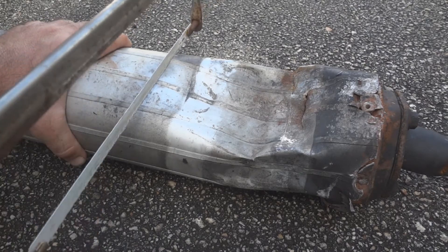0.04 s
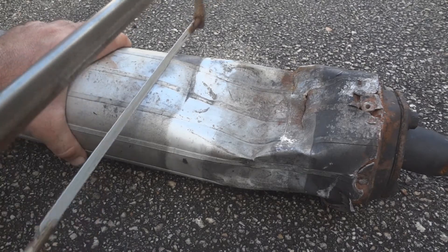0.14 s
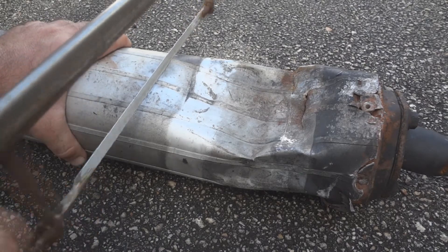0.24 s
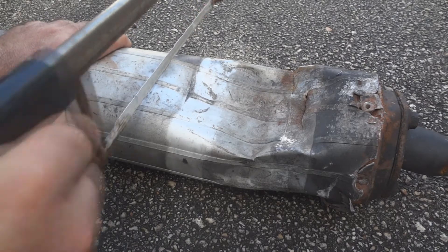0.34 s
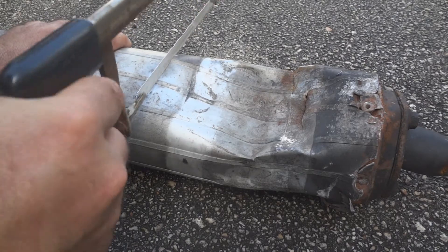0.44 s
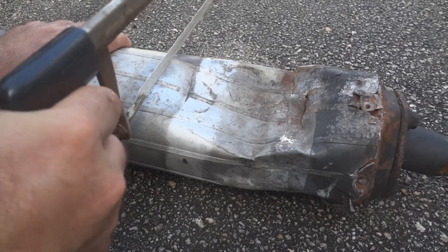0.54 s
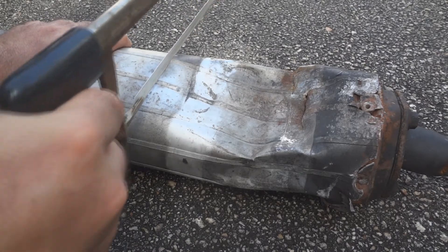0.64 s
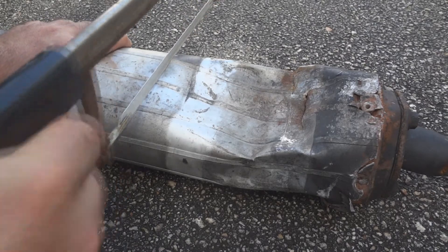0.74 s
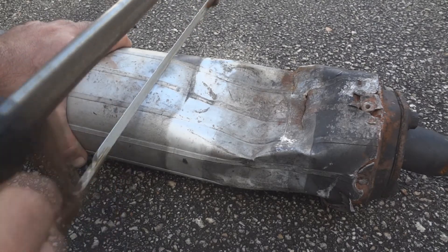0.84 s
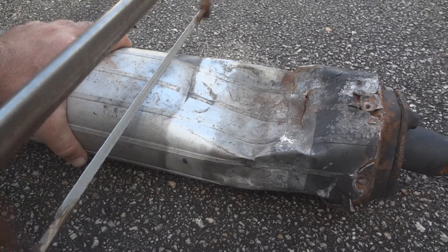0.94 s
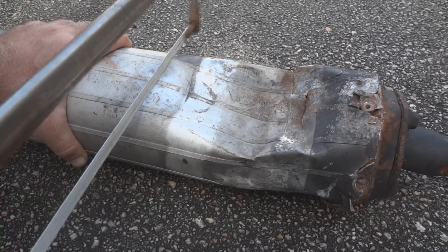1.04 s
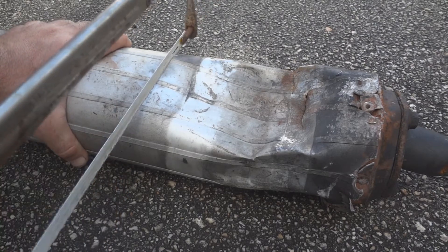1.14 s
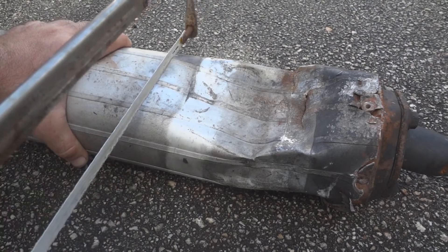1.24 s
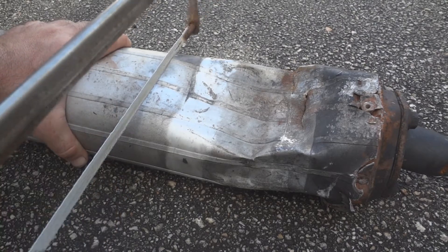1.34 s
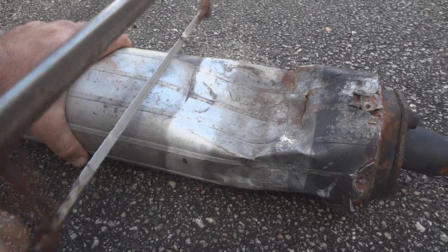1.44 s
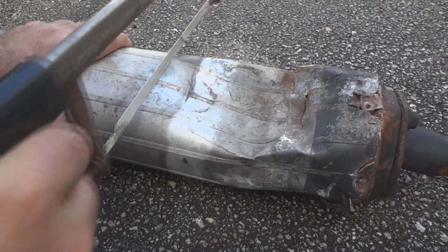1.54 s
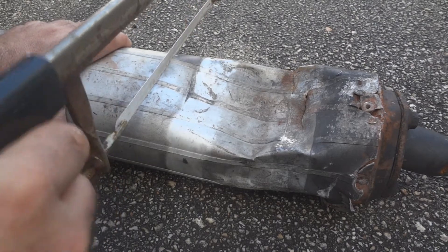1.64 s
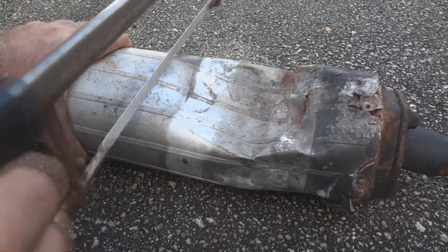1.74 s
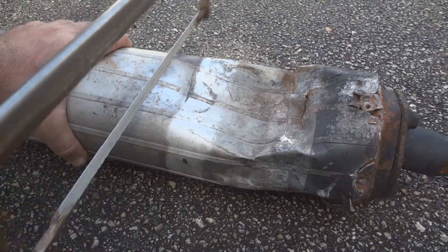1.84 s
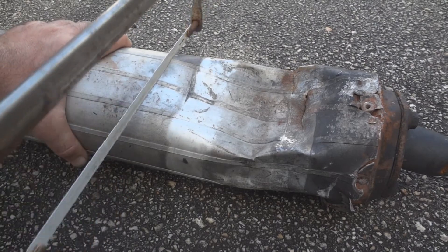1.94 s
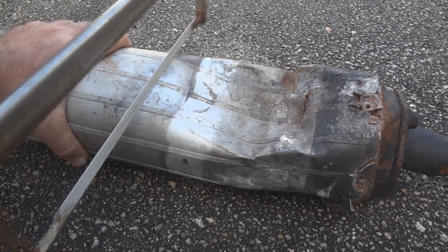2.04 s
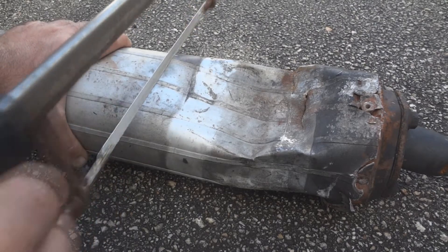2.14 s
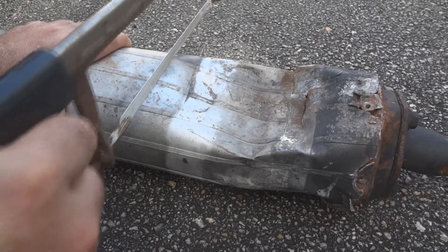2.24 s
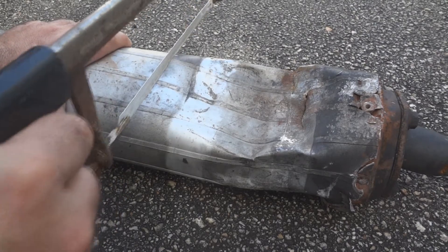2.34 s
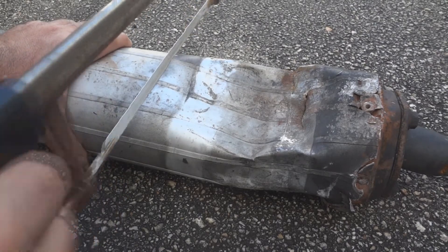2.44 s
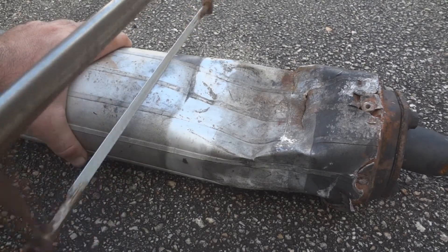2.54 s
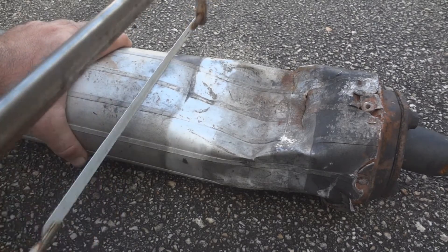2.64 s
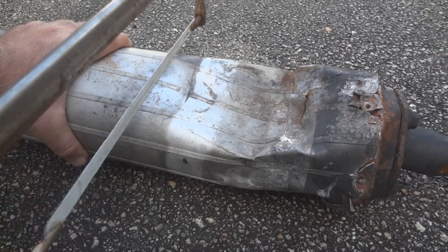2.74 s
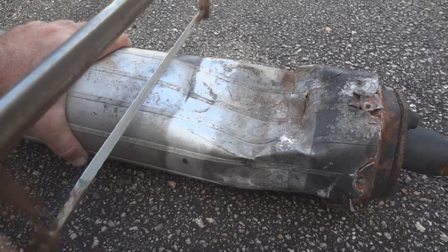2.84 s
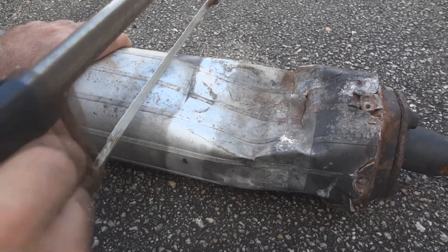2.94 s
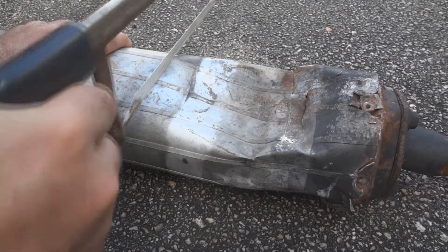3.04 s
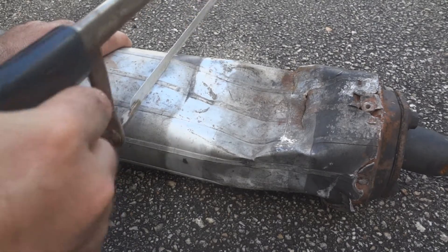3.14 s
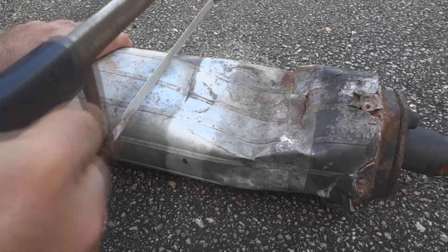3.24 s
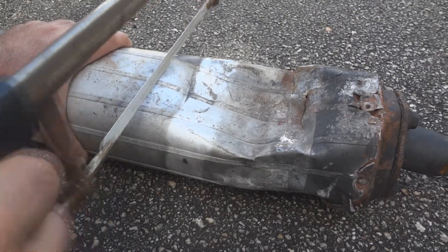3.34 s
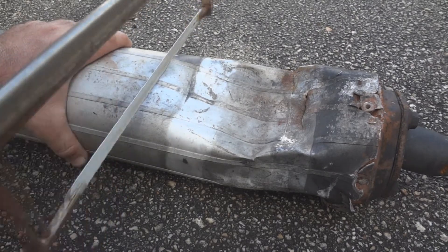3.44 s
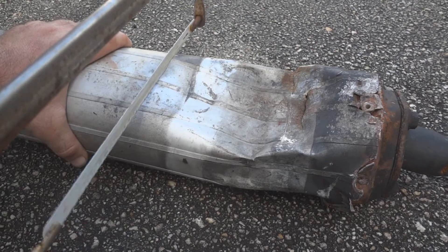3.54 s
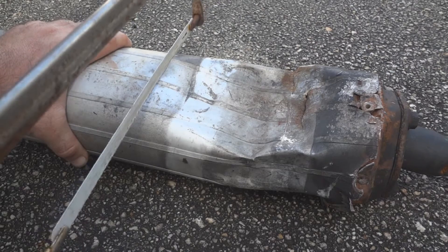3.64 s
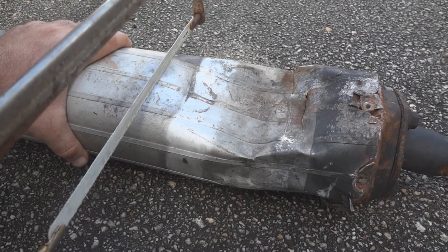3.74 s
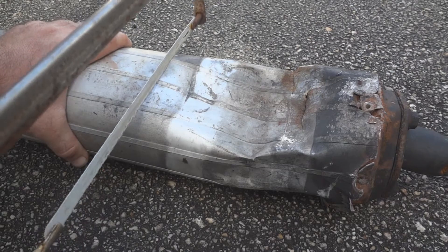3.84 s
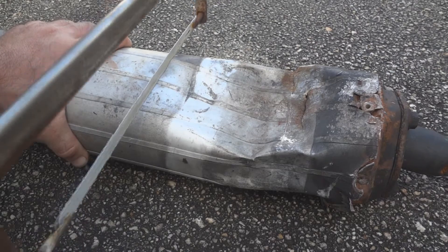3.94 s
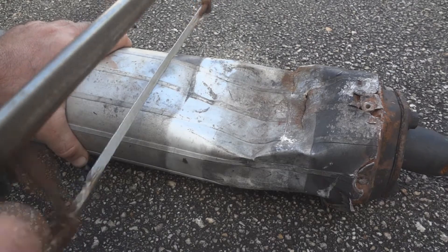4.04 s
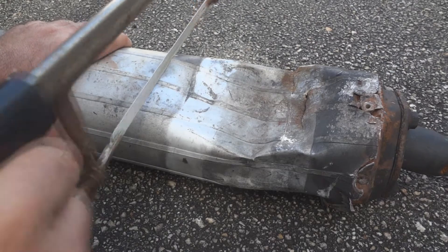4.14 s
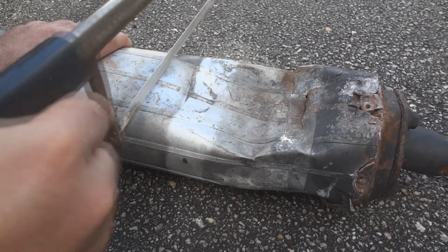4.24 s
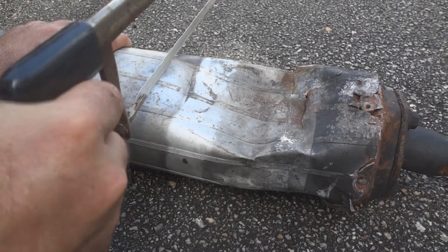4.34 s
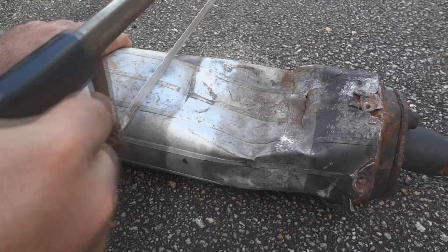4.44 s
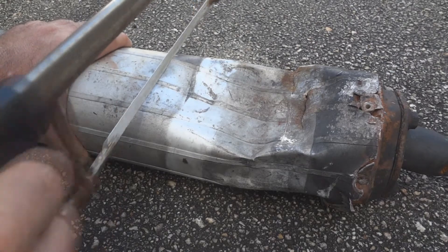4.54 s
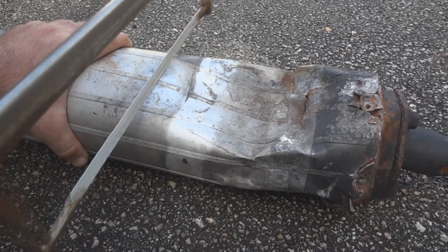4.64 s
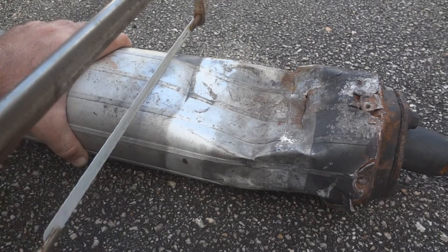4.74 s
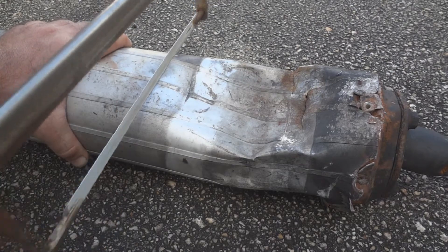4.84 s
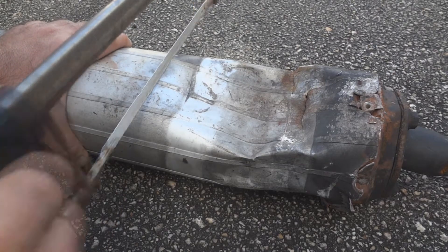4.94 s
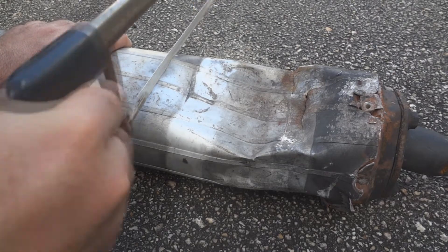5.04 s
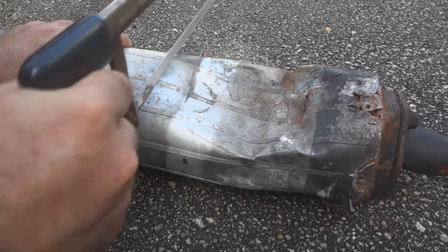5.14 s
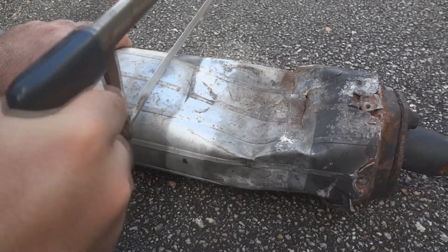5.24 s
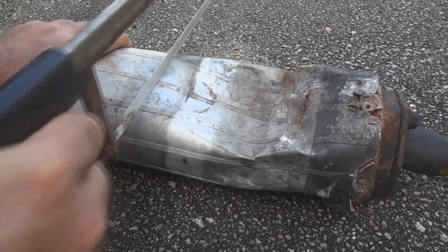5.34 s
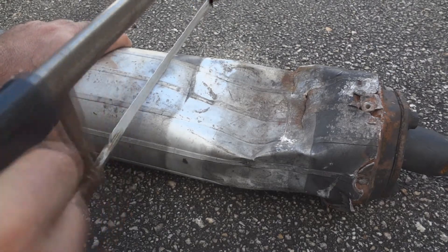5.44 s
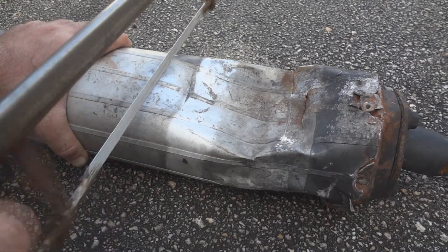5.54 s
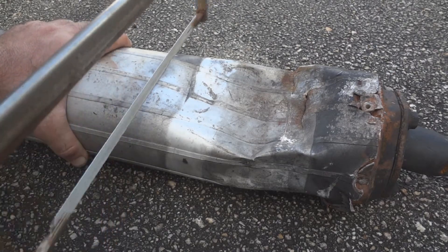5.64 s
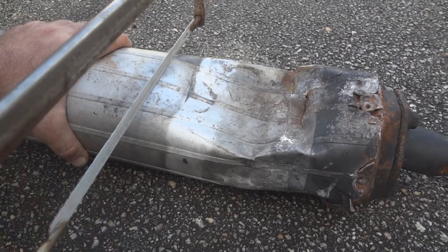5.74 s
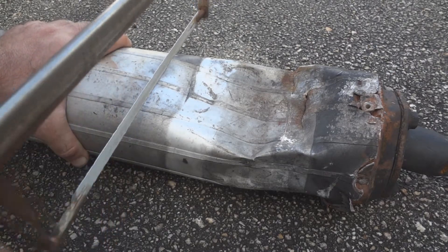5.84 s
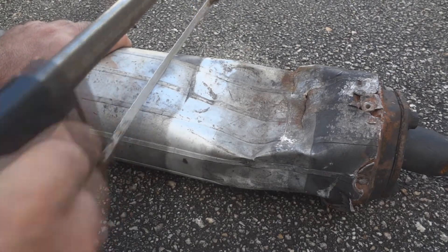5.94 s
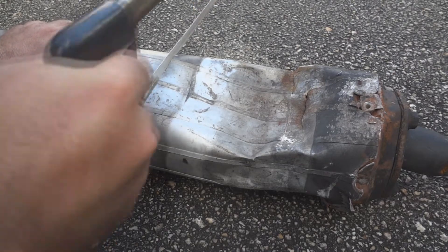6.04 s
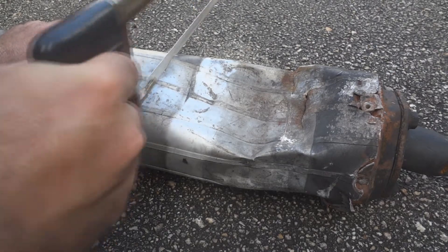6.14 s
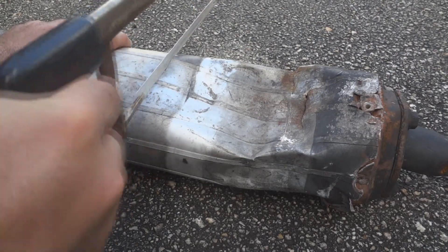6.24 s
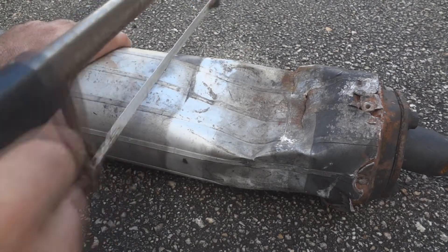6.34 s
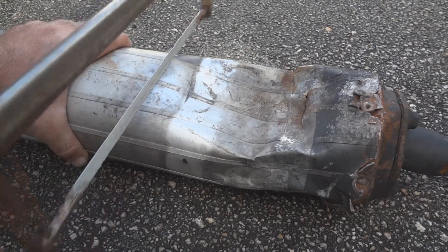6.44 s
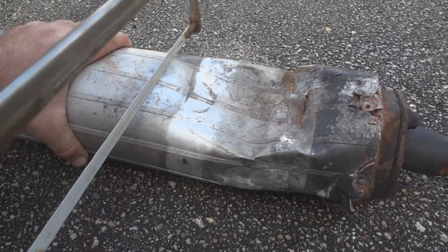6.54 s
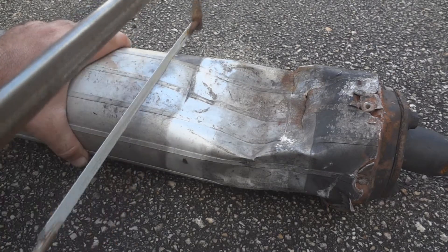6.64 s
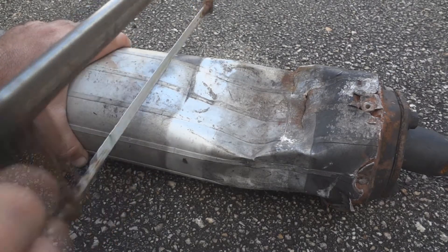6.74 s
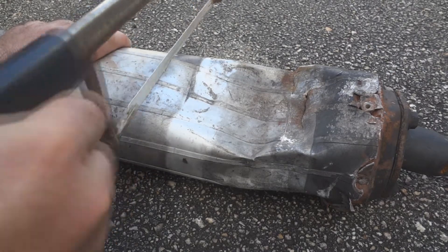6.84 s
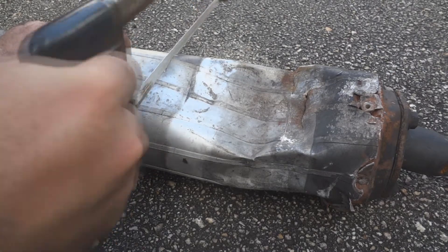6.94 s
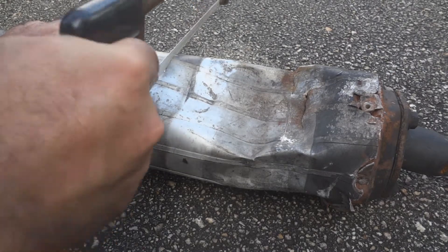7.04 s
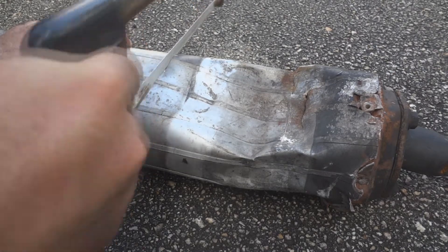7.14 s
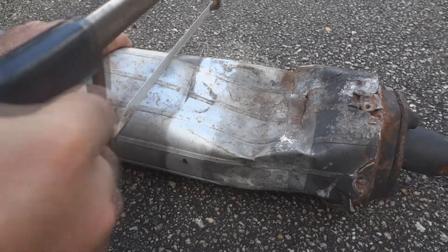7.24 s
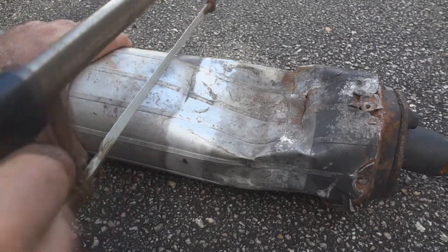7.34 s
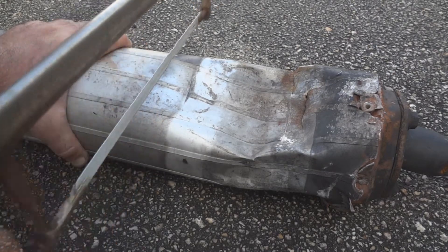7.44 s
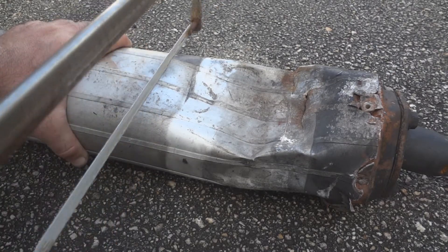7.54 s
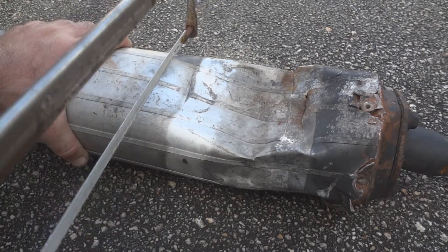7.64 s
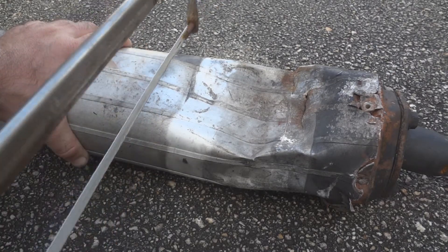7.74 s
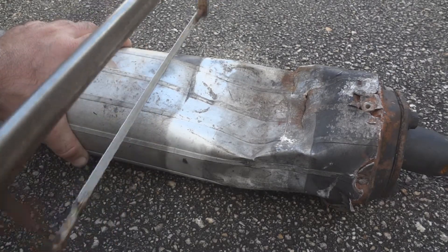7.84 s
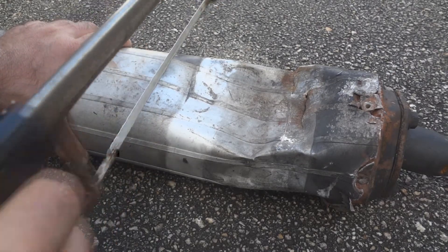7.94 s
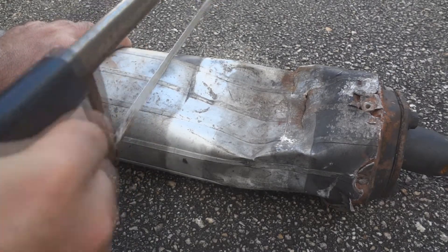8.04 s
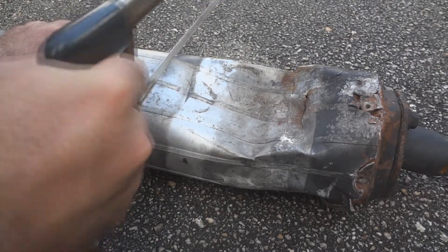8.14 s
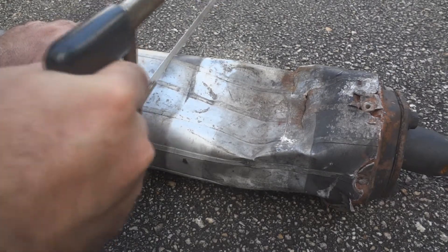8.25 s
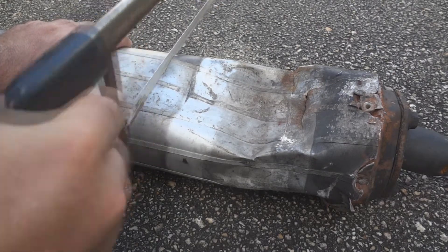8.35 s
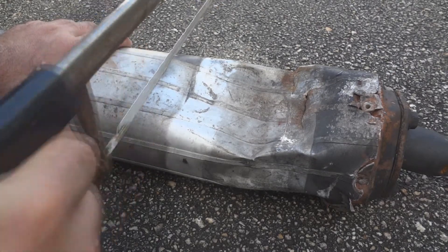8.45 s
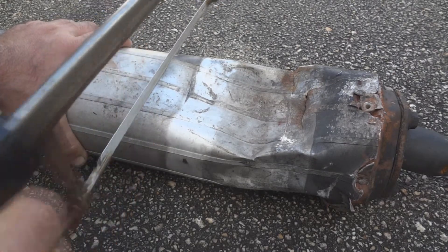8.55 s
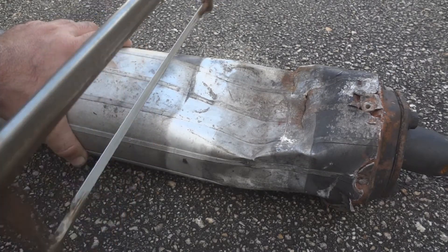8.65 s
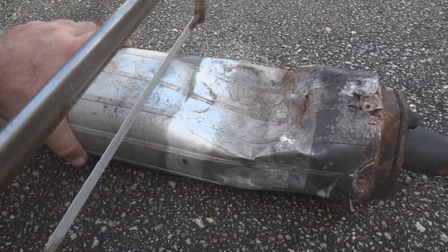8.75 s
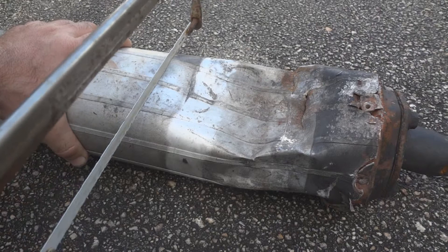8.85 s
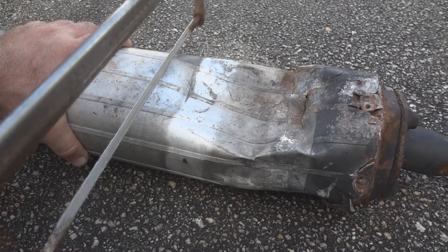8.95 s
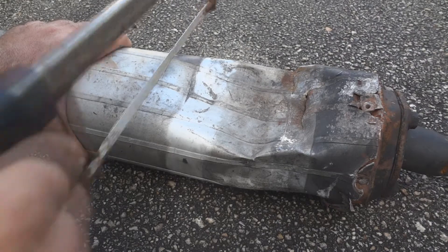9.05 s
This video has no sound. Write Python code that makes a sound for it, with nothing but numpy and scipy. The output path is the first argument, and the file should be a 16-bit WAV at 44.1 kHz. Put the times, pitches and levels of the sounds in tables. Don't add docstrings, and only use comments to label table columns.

```python
import sys
import numpy as np
from scipy import signal
from scipy.fft import rfft, irfft, next_fast_len
from scipy.io import wavfile
from scipy.ndimage import map_coordinates

SR = 44100
rng = np.random.default_rng(int(sys.argv[2]) if len(sys.argv) > 2 else 0)


def pcm_store(signal):
    levels = np.round(np.clip(np.atleast_2d(signal), -1, 1) * 32767)
    wavfile.write(sys.argv[1], SR, levels.astype(np.int16).T)


def decibels_to_gain(level_db):
    exponent = np.asarray(level_db, float) / 20
    return 10 ** exponent


N = 400428

# [t/s, level/dB]
BACKGROUND_LEVEL = [(0, -39), (1, -39), (1.7, -43), (3, -41.5), (4.6, -39), (5.1, -43.5), (5.6, -41.5),
                    (6, -44.5), (6.3, -34.5), (7.4, -37.5), (8.1, -40.5), (8.6, -38.5), (9.08, -38)]
# [f/Hz, density/dB]
FAR_SPECTRUM = [(12, -71), (20, -16.5), (123, -12), (277, -18.5), (377, -21.5), (422, -18), (472, -21),
                (1060, -22), (16000, -76)]
# [t/s, depth/dB]
DUCKS = [(.06, 8), (1.14, 19), (2.03, 10), (3.6, 15), (4.77, 19), (6.63, 22), (7.68, 16)]
# [start t/s, length/s, rasp level at start/dB, at end/dB, top tooth rate f/Hz]
PULLS = [(-.3, .4, -26, -31, 1402), (.86, .32, -30, -24, 1520), (1.82, 0.21, -33, -21.5, 1402),
         (2.51, .25, -34.5, -31, 1500), (3.32, 0.32, -32, -24, 1566), (4.52, 0.31, -28.5, -25.5, 1520),
         (5.38, 0.411, -41, -25, 1500), (6.28, 0.37, -36.5, -19.5, 1500), (7.215, 0.5, -29.5, -24, 1199),
         (8.43, 0.48, -35.5, -28, 1500)]
PUSHES = [(.275, 0.23, -25, -25.5, 1449), (1.46, 0.18, -25.5, -25, 1500), (2.12, .21, -25.5, -30, 1500),
          (2.95, 0.21, -23.5, -25, 1348), (4.08, 0.34, -29.5, -24, 1290), (4.96, 0.22, -24, -27.5, 1293),
          (5.93, 0.2103, -27, -24, 1300), (6.77, 0.32, -27.5, -28, 1441), (7.88, 0.35, -30, -22.5, 1300),
          (9.04, 0.24, -29.5, 2, 1432)]
PULL_SPEED = [(-.15, 1), (.35, 0.68), (.7, 1.0), (1.1, .74)]
PUSH_SPEED = [(-.15, 0.6), (.35, 0.99), (.7, .84), (1.1, .62)]
# [t/s, level/dB, half width/s]
JOLTS = [(.01, 2, .03), (1.0, -3, 0.075), (2.75, 3, .02), (3.335, 9.5, 0.031), (3.46, -6.5, 0.024),
         (5.158, 4.5, 0.017), (5.5, -4.5, 0.026), (6.03, 2.5, 0.041), (6.4, 5, 0.024), (6.78, 3, .02),
         (6.98, -4.5, 0.054), (7.216, 4.5, .02), (7.386, -0.5, 0.085), (7.483, -5.5, 0.066),
         (8.125, -13, 0.047), (8.204, 0, 0.022), (8.461, 12, 0.021), (8.56, 1.5, 0.022),
         (1.364, -12, .03), (2.42, -13, 0.012), (2.495, 2, 0.033), (0.787, 5, 0.043), (1.46, -3, 0.029),
         (4.89, 4.5, 0.019), (8.9, 4, 0.016), (7.86, 1.5, 0.042), (3.3, -20, 0.016), (4.465, -18, 0.037),
         (7.16, -13, 0.041), (8.28, 1, 0.012), (6.73, 5.5, 0.023), (8.15, 9, 0.022)]
# [t/s, f/Hz, level over tooth tone/dB, half width/s, glide: 1 rising, -1 falling]
SQUEAKS = [(.43, 1182, 9.5, .04, -0.97), (.89, 1162, 9.3, .06, 1), (1.64, 1211, 10.8, 0.032, -1.08),
           (1.87, 1098, 11, 0.031, 0.99), (2.26, 1233, 19, .03, -1.1), (2.497, 1124, 23.3, 0.03986, 1),
           (3.04, 1195, 12, .06, -1.014), (3.14, 1002, 8.3, 0.027, -1.05), (3.49, 1242, 7, 0.033, 0.78),
           (4.24, 1189, 10, 0.048, 1), (4.62, 1197, 10, 0.028, 1), (5.0, 1055, 10.1, 0.049, 1),
           (5.55, 1150, 26.7, .035, 1), (6.11, 980, 9.7, .025, -0.88), (6.155, 790, 17, .025, -1.2),
           (6.385, 1069, 20, .035, 0.94), (7.27, 902, 7.1, 0.043, 0.98), (8.18, 1013, 9, 0.039, -0.93),
           (8.585, 1120, 20, .04, 0.74)]
# [f/Hz, width/Hz, level/dB]
SHELL_LOW = [(743, 135, -2), (1000, 122, -2), (1138, 190, -2), (1290, 208, -1), (1520, 177, 2),
             (1880, 670, -10)]
# [f/Hz, width/Hz, level/dB]
SHELL_SKIN = [(2150, 140, -2.5), (2372, 120, -5), (2704, 276, -10.5), (3076, 126, -8.5), (3400, 278, -5.5),
              (3814, 202, -5.5), (4075, 330, -13), (4940, 530, -13.5), (5250, 280, -10.5), (5960, 340, -14)]
# [f/Hz, density/dB]
BLADE_HISS = [(5000, -31), (6500, 5.5), (8000, -4), (10000, -4.5), (11800, -10.5), (13000, -6),
              (14500, -7.5), (15700, -2.5)]
# [f/Hz, width/Hz, level/dB]
BLADE_RINGS = [
    [(6570, 230, 0)],
    [(7755, 150, 0), (9850, 90, -12)],
    [(8630, 68, -1.5), (11230, 45, -8)],
]
# [level cut at the far end/dB, level cut by the handle/dB]
BLADE_ENDS = [(-12.5, -8), (-11.5, -12.5), (-31, -11), (-24.5, -9)]
# [t/s, level of lower, middle, upper ring/dB]
TENSION = [(0, 4, 2, .1), (1.2, 3, -12.5, -16), (2.1, -11, -7, 0), (2.5, 0, -7, -6), (3.3, -13, 7, 3),
           (4.5, 1, -1, -3), (5.5, -8.5, 8, 2.5), (6.3, 8, 11, 2.5), (6.9, 4, 8, 9.5), (7.3, 8.5, 10.5, 2),
           (7.6, 4.5, 13, 13), (8.0, -11, -4, -3), (8.4, 8, 8.5, 0.5), (9.08, -13, -11, -6)]
# [f/Hz, width/Hz, level/dB]
FRAME = [(2172, 8.1, -1.2), (2740, 6.5, -1.5), (3450, 14, -11)]
# [lock t/s, fundamental level/dB, low, middle, high overtones level/dB]
CHATTER = [(-.02, -22, -28.5, -25.5, -34.5), (1.06, -25, -28.5, -31, -33.5), (1.955, -24.5, -36, -36, -33),
           (2.72, -24, -28.5, -23, -35), (3.53, -23, -27, -28.5, -44), (4.69, -23, -26, -28.5, -35.5),
           (5.74, -22, -31, -22.5, -35), (6.59, -24.5, -35, -53, -34), (7.57, -22, -26.5, -37.5, -30.5),
           (8.84, -21, -28.5, -24, -31)]
# [multiple of the fundamental, level/dB]
OVERTONES = [
    [(2, -0.5), (3, -1)],
    [(4, 1), (5, -3)],
    [(6, -0.5), (7, 3.5), (8, -6), (9, -21), (10, -14), (12, -17)],
]
# [t/s, peak level/dB]
KNOCKS = [(0.69, -76), (1.181, -10.5), (1.237, -10.5), (1.701, -3), (2.324, -4.5), (2.347, -3.5),
          (2.442, -43), (3.155, -14), (3.255, -21.5), (3.318, -26), (3.817, -21.5), (4.112, -16),
          (5.129, -19), (5.374, -22), (6.193, -9), (6.234, -28), (6.92, -2.5), (6.945, -8), (6.974, -4.5),
          (6.997, -10), (7.21, -16), (8.023, -8.5), (8.047, -6), (8.066, -4.5), (8.085, -2.5), (8.105, -3),
          (8.138, -9), (8.304, -1.5)]
# [f/Hz, level/dB, t60/s]
KNOCK_MODES = [(494, -5, 0.044), (663, -19, 0.18), (781, -7.5, 0.092), (980, 5, 0.023), (1122, -2, 0.044),
               (1300, -16, .05), (1520, -15.5, 0.078)]
# [t/s, peak level/dB, f/Hz, t60/s]
THUMP = [
    (4.112, -10, 227, 0.084),
]
# [f/Hz, side over mid level/dB]
SIDE_SPECTRUM = [(60, -58), (150, -20), (380, -5), (950, -13.5), (2380, -9.5), (5980, -13), (15000, -14)]

SWELL_S, LINGER_S = 0.13, 0.018


def unit(x):
    return x / np.sqrt(np.mean(x ** 2) + 1e-20)


def along(points, hz):
    f, v = np.transpose(points)
    return np.interp(np.log(hz + 1), np.log(f + 1), v)


def curves(rows):
    s, *cols = np.transpose(rows)
    return [np.interp(np.arange(N) / SR, s, c) for c in cols]


def wobble(rate):
    knots = rng.standard_normal(int(N * rate / SR) + 4)
    return map_coordinates(knots, [np.arange(N) * rate / SR])


def filtered(x, response):
    m = next_fast_len(len(x) + SR // 4)
    return irfft(rfft(x, m) * response(np.fft.rfftfreq(m, 1 / SR)), m)[:len(x)]


def modes(table):
    def response(f):
        return sum((-1) ** k * decibels_to_gain(db) * 1j * f * w / (c * c - f * f + 1j * f * w)
                   for k, (c, w, db) in enumerate(table))
    return response


def above(hz):
    return lambda f: (1j * f / hz) ** 2 / (1 + 1.4j * f / hz - (f / hz) ** 2)


def background():
    air_db, = curves(BACKGROUND_LEVEL)
    t = np.arange(N) / SR
    for s, depth_db in DUCKS:
        fall, recovery = ((s - t) / 0.055) ** 2, (t - s) / 0.11
        air_db = air_db - depth_db * np.exp(-np.where(t < s, fall, recovery))
    rush = filtered(rng.standard_normal(N), lambda f: decibels_to_gain(along(FAR_SPECTRUM, f)))
    hum_hz = 119.5 * (1 + 0.0099 * wobble(8))
    hum = np.sin(2 * np.pi * np.cumsum(hum_hz) / SR) * decibels_to_gain(-7.5 + 2.5 * wobble(10))
    wind = filtered(rng.standard_normal(N), lambda f: (f / 55) ** 2 / (1 + (f / 75) ** 5))
    gusts = unit(wind) * decibels_to_gain(-8 + 3.5 * wobble(9.3))
    return decibels_to_gain(air_db) * (decibels_to_gain(-4.0) * unit(rush) + hum + gusts)


def strokes():
    t = np.arange(0, N / SR + .01, .002)
    arch_db, fall = 2, 540
    creep_db, creep_fall = -24, 96
    power, rate, place = np.zeros(len(t)), [], []
    for rows, speed, rise, first in [(PULLS, PULL_SPEED, 196, 1), (PUSHES, PUSH_SPEED, 378, 0)]:
        for s, length, start_db, end_db, hz in rows:
            u = np.clip((t - s) / length, 0, 1)
            early, late = np.maximum(s - t, 0), np.maximum(t - s - length, 0)
            edge = decibels_to_gain(-rise * early - fall * late) + decibels_to_gain(creep_db - creep_fall * (early + late))
            pressure_db = start_db + (end_db - start_db) * u + arch_db * np.sin(np.pi * u)
            power += (edge * decibels_to_gain(pressure_db)) ** 2
            rate += [(s + share * length, part * hz) for share, part in speed]
            place += [(s, first), (s + length, 1 - first)]
    jolts_db = sum(db * np.exp(-((t - s) / w) ** 2) for s, db, w in JOLTS)
    rasp_db = 10 * np.log10(power) + jolts_db
    return curves(np.transpose([t, rasp_db])) + curves(sorted(rate)) + curves(sorted(place))


def locked():
    rows = []
    for (lock, *_), (s, length, *_) in zip(CHATTER, PULLS):
        end = s + length
        rows += [(lock - SWELL_S / 2, 0), (lock, 1), (end, 1), (end + LINGER_S, 0)]
    return curves(rows)[0]


def squeaks(tooth_hz):
    glide = 898
    t, swell_db = np.arange(N) / SR, np.zeros(N)
    for s, hz, db, w, way in SQUEAKS:
        near = np.exp(-((t - s) / w) ** 2)
        tooth_hz = tooth_hz + np.sqrt(near) * (hz + way * glide * (t - s) - tooth_hz)
        swell_db += db * near
    return tooth_hz, swell_db


def grit(scatter_db):
    return rng.standard_normal(N) * decibels_to_gain(scatter_db * wobble(400) + 1.11 * wobble(60) + 0.77 * wobble(20))


def ridge(x, centre_hz):
    gain_db, octaves = 1, 0.87
    hz, t, z = signal.stft(x, SR, nperseg=512)
    centre = centre_hz[np.minimum((t * SR).astype(int), N - 1)]
    away = np.log2((hz[:, None] + 1) / centre) / octaves
    z = z * decibels_to_gain(gain_db * np.exp(-away ** 2))
    return signal.istft(z, SR, nperseg=512)[1][:N]


def sheet(x, t60):
    t = np.arange(SR // 6) / SR
    shares = np.array([wobble(5) for _ in range(6)])
    shares /= np.linalg.norm(shares, axis=0)
    tails = rng.standard_normal((6, len(t))) * decibels_to_gain(-60 * t / t60)
    return sum(signal.fftconvolve(x * share, tail / np.linalg.norm(tail))[:N]
               for share, tail in zip(shares, tails))


def shell_sound(turn, tooth_hz, tooth_db, low_db, rasp_db):
    blur = np.sin(turn + 2.04 * wobble(500)) * decibels_to_gain(3.37 * wobble(200))
    tone = unit(np.sin(turn) * decibels_to_gain(5.0 * wobble(60)))
    bite = decibels_to_gain(tooth_db - 10.5) * tone + decibels_to_gain(-4.0) * unit(blur) + grit(scatter_db=3.5) * 1.65
    low = filtered(filtered(ridge(bite, tooth_hz), modes(SHELL_LOW)), above(hz=636))
    low = decibels_to_gain(low_db - 0.1) * unit(low)
    high = filtered(grit(scatter_db=2.5) * (1 + 0.18 * np.sin(turn)), modes(SHELL_SKIN))
    scrape = filtered(grit(scatter_db=5.0), modes([(2870, 2600, 0)]))
    high = unit(high) + decibels_to_gain(-7.0) * unit(scrape)
    return decibels_to_gain(rasp_db) * (low + unit(filtered(high, above(hz=1500))))


def blade_sound(place):
    hiss_db, *rings_db = [far_db + (near_db - far_db) * place for far_db, near_db in BLADE_ENDS]
    rings_db = np.add(rings_db, curves(TENSION))
    hiss = filtered(grit(scatter_db=2.0), lambda f: decibels_to_gain(along(BLADE_HISS, f)))
    blade = decibels_to_gain(hiss_db + 4.0) * unit(hiss)
    for ring_db, table in zip(rings_db, BLADE_RINGS):
        ring = filtered(filtered(grit(scatter_db=5.5), modes(table)), above(hz=5000))
        blade += decibels_to_gain(ring_db - 2.2 + 1.4 * wobble(25)) * unit(ring)
    return blade


def saw():
    rasp_db, tooth_hz, place = strokes()
    low_db = 2 - 0.2554 * (rasp_db + 26.5) - 0.5 * locked()
    rasp_db = rasp_db + 0.89 * wobble(35)
    tooth_hz, swell_db = squeaks(tooth_hz)
    tooth_db = -4 + swell_db - 12 * locked()
    uneven_hz = tooth_hz * (1 + 0.02813 * wobble(160) + 0.01967 * wobble(30))
    turn = 2 * np.pi * np.cumsum(uneven_hz) / SR
    shell = shell_sound(turn, tooth_hz, tooth_db, low_db, rasp_db)
    blade = blade_sound(place)
    frame = filtered(decibels_to_gain(rasp_db + 1.5) * grit(scatter_db=9.0), modes(FRAME))
    squeak = decibels_to_gain(rasp_db - 14) * (decibels_to_gain(swell_db) - 1) * np.sin(turn)
    shell = 0.76 * shell + 0.55 * sheet(shell, t60=0.037)
    blade = decibels_to_gain(rasp_db) * (0.75 * blade + 0.69 * sheet(blade, t60=0.027))
    return squeak + frame + shell + blade


def chatter():
    free_hz, lock_hz, slap_hz, sag = 558, 554, 540, 58.4
    hint_s, hint_db, swell_db = 0.24, -25, -26
    slap_s, before_slap_db = 0.0377, [-6.5, -23, -32]
    settle_db, fade = -3.5, 31
    out, t = np.zeros(N), np.arange(N) / SR
    drift, flutter, shake, *sways = [wobble(rate) for rate in (90.6, 50.1, 120.5, 60, 60.8, 58.9)]
    for (lock, top_db, *slaps_db), (start, length, *_) in zip(CHATTER, PULLS):
        end = start + length + LINGER_S
        after = end - lock - slap_s
        s = [lock - hint_s, lock - SWELL_S, lock, lock + slap_s, end]
        hz = [free_hz, free_hz, lock_hz, slap_hz, slap_hz - sag * after]
        root_db = top_db + np.array([hint_db, swell_db, 0, settle_db, settle_db - fade * after])
        now = slice(max(int(s[0] * SR), 0), int(end * SR) + 400)
        edge = np.clip(np.minimum(t[now] - s[0], end + .009 - t[now]) / .014, 0, 1)
        pitch_hz = np.interp(t[now], s, hz) * (1 + 0.00887 * drift[now])
        turn = 2 * np.pi * np.cumsum(pitch_hz) / SR
        level_db = np.interp(t[now], s, root_db) - 1.3 + 2.47 * flutter[now]
        buzz = decibels_to_gain(level_db) * np.sin(turn + 0.19 * shake[now])
        shaken = turn + 0.22 * shake[now]
        for slap_db, before_db, sway, family in zip(slaps_db, before_slap_db, sways, OVERTONES):
            sway_db = slap_db + before_db * np.interp(t[now], s, [5.5, 2.5, 1, 0, 0]) + 2.2 * sway[now]
            tones = sum(decibels_to_gain(db) * np.sin(k * shaken + 7 * rng.random()) for k, db in family)
            buzz += decibels_to_gain(sway_db) * tones
        out[now] += edge * 1.635 * buzz
    return out


def knocks():
    out, t = np.zeros(N + SR), np.arange(SR // 5) / SR
    for s, db in KNOCKS:
        ring = np.zeros(len(t))
        for hz, level, t60 in KNOCK_MODES:
            decay = decibels_to_gain(level + rng.normal(0, 2) - 60 * t / t60)
            ring += decay * np.sin(2 * np.pi * hz * rng.normal(1, .015) * t)
        crack = rng.standard_normal(len(t)) * decibels_to_gain(-60 * t / 0.058)
        crack = filtered(crack, modes([(2300, 1350, 0.0034)]))
        blow = ring / np.abs(ring).max() + decibels_to_gain(-19.5) * crack
        out[round(s * SR):][:len(t)] += decibels_to_gain(db + 5.5) * (1 - np.exp(-t / 0.0015)) * blow
    out = filtered(filtered(out, above(hz=410)), above(hz=400))
    for s, db, hz, t60 in THUMP:
        turn = 2 * np.pi * hz * t
        sway = np.sin(turn) + 0.39 * np.sin(1.6 * turn) + 0.71 * np.sin(0.71 * turn)
        out[round(s * SR):][:len(t)] += decibels_to_gain(db - 60 * t / t60) * (1 - np.exp(-t / 0.0093)) * sway
    return out[:N]


def shriek():
    s, half_width_s, hz, width_hz, peak_db = 6.65, .05, 3430, 16, -14
    burst = grit(scatter_db=3.5) * np.exp(-((np.arange(N) / SR - s) / half_width_s) ** 2)
    ring = filtered(burst, modes([(hz, width_hz, 0), (1.08 * hz, 5 * width_hz, -9)]))
    return decibels_to_gain(peak_db) * ring / np.abs(ring).max()


def scene():
    buzz = chatter()
    frame_buzz = decibels_to_gain(-8.5) * filtered(buzz, modes(FRAME))
    mid = saw() + buzz + frame_buzz + knocks() + background() + shriek()
    turned = np.imag(signal.hilbert(mid, next_fast_len(N))[:N])
    side = filtered(0.8 * turned + 0.59 * saw(), lambda f: decibels_to_gain(along(SIDE_SPECTRUM, f)))
    side = side + decibels_to_gain(-15.5) * background()
    return np.array([mid * decibels_to_gain(2.0) + side, mid * decibels_to_gain(1.27) - side])


def roll_off(x):
    return signal.sosfilt(signal.butter(12, 16430, fs=SR, output="sos"), x)


def record(dry):
    top_hz = 15780
    held = dry / (1 + np.abs(dry / .62) ** 5) ** (1 / 5)
    kept = np.array([filtered(ch, lambda f: np.clip((top_hz - f) / 150, .003, 1)) for ch in held])
    return roll_off(kept)


dry = scene()
out = record(dry)
pcm_store(out)
```